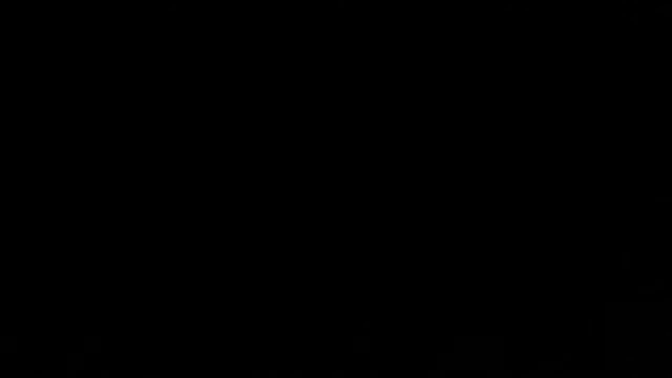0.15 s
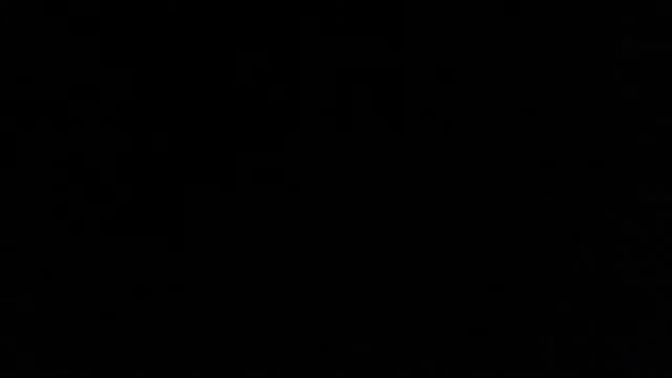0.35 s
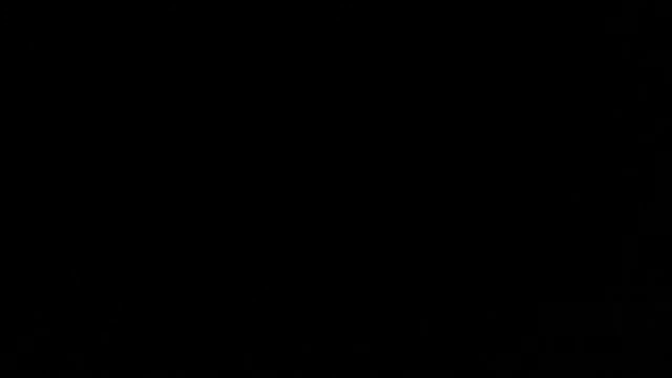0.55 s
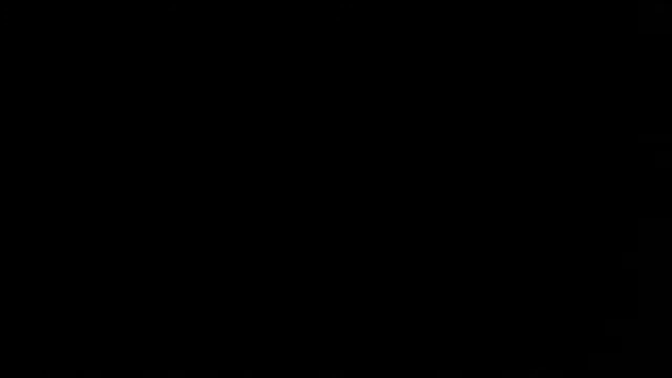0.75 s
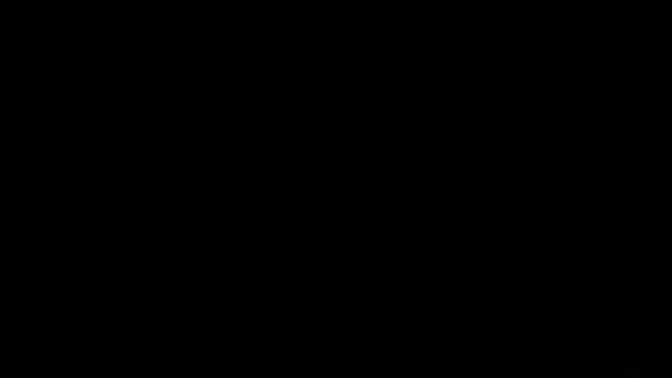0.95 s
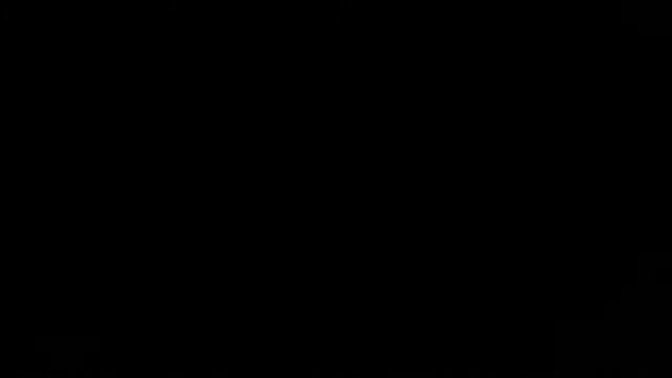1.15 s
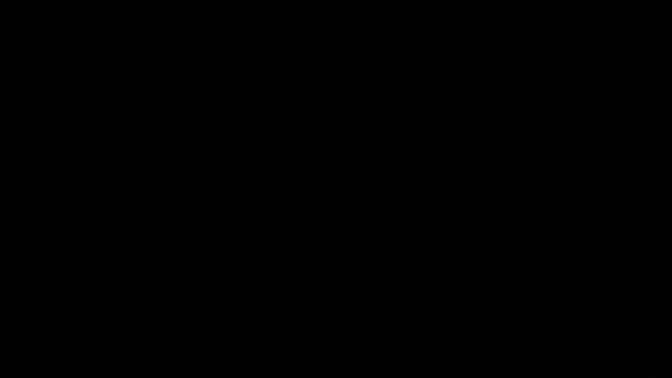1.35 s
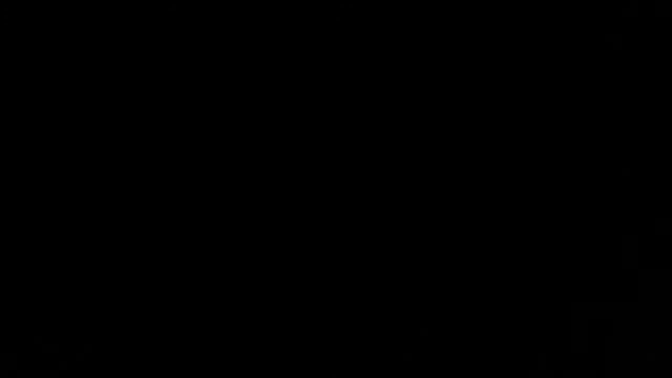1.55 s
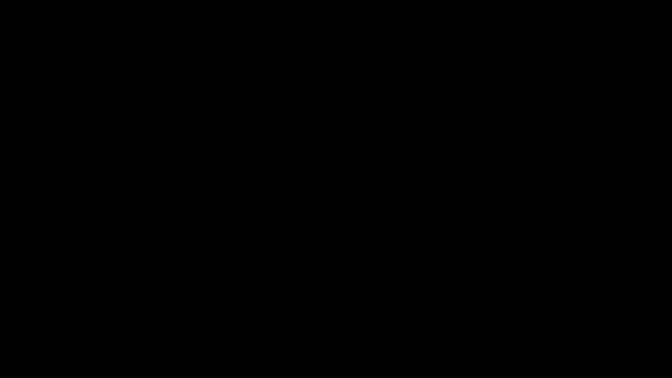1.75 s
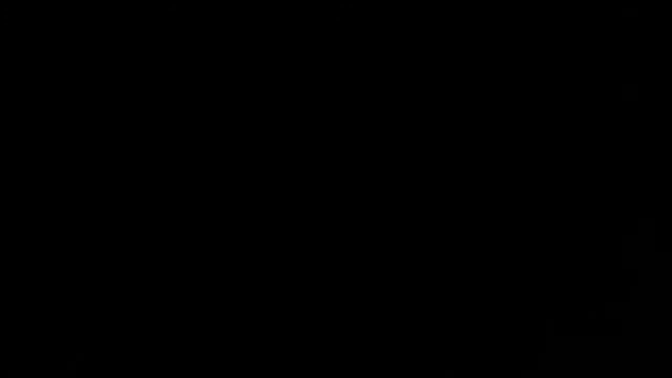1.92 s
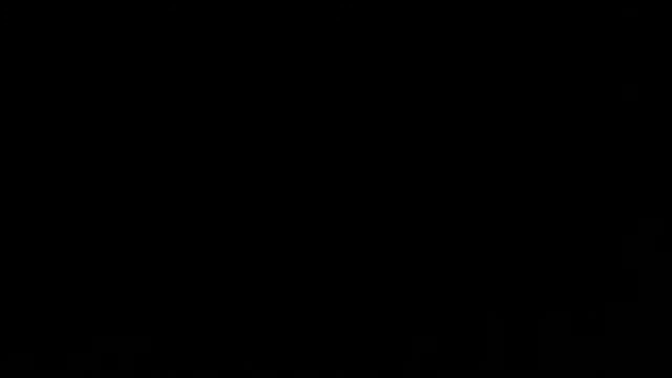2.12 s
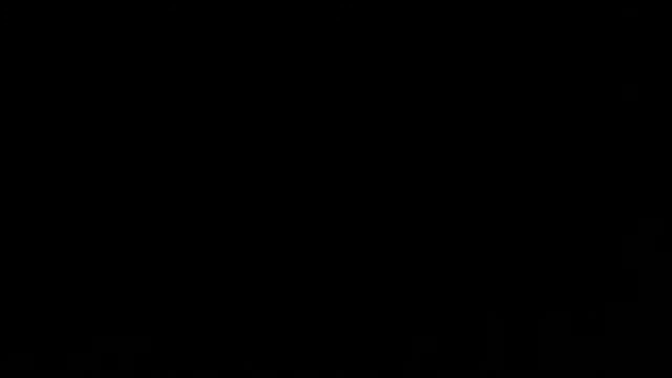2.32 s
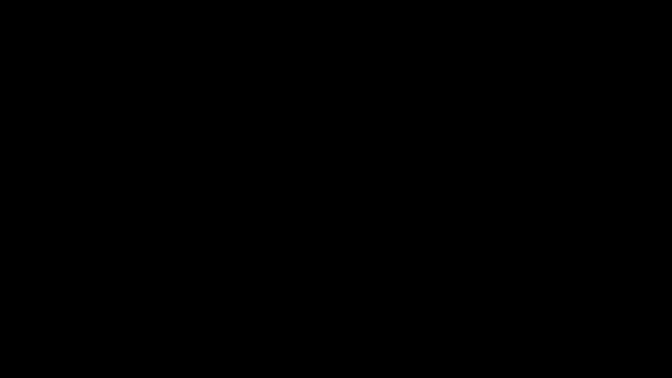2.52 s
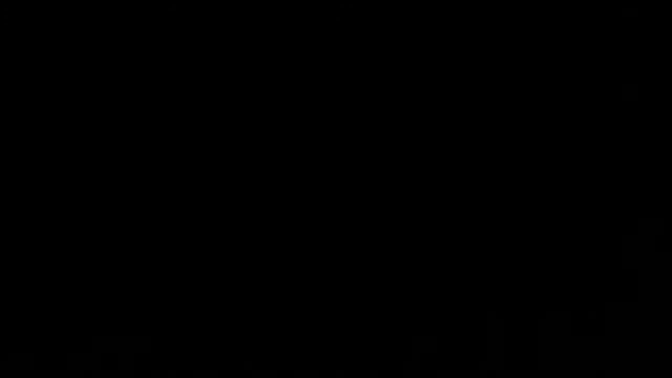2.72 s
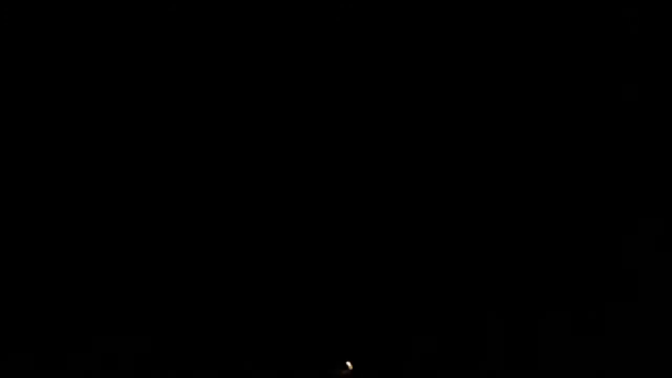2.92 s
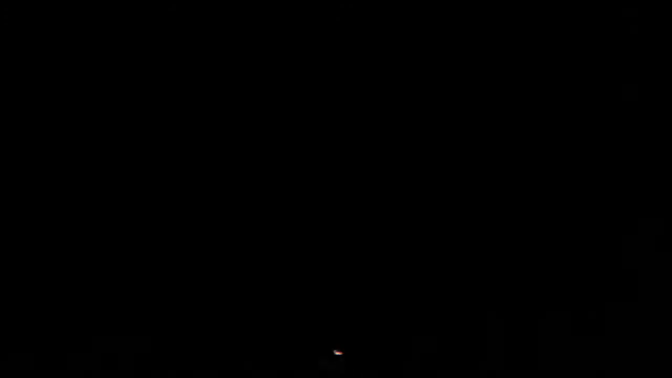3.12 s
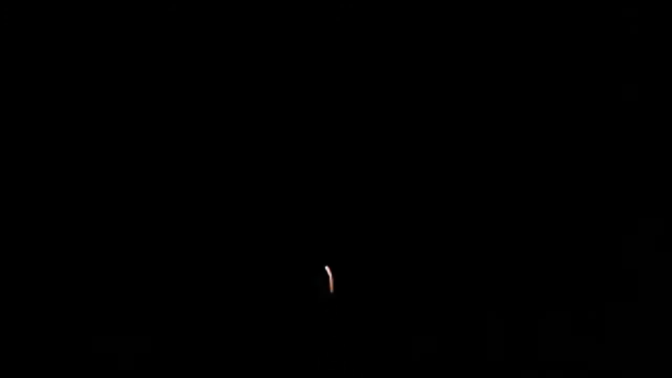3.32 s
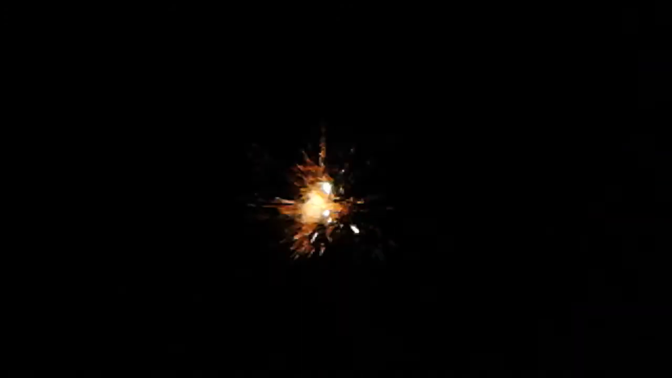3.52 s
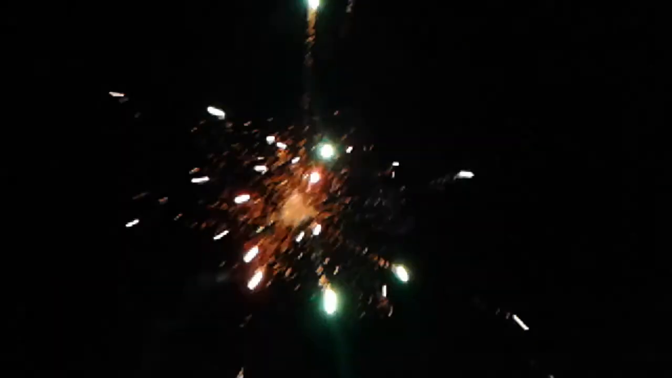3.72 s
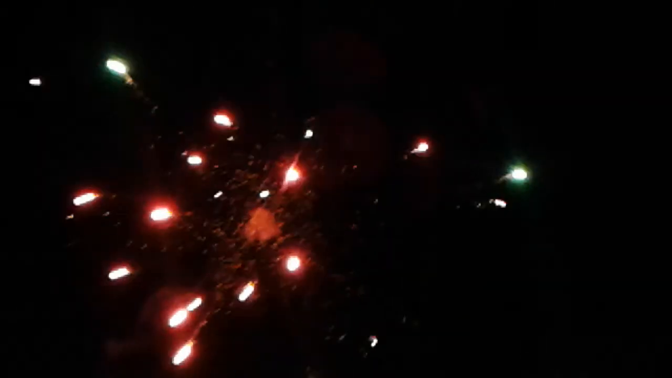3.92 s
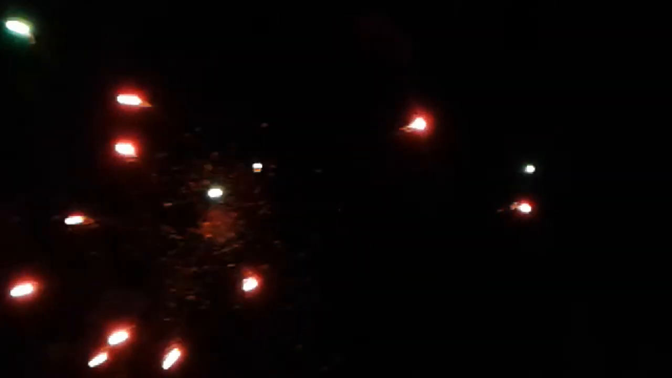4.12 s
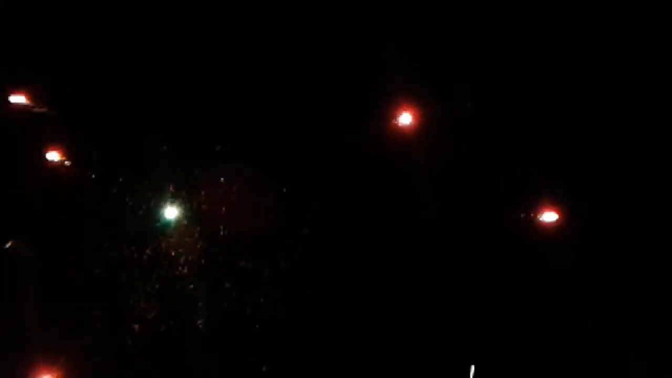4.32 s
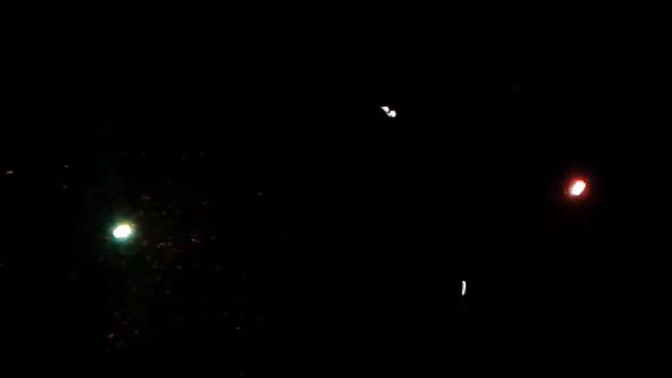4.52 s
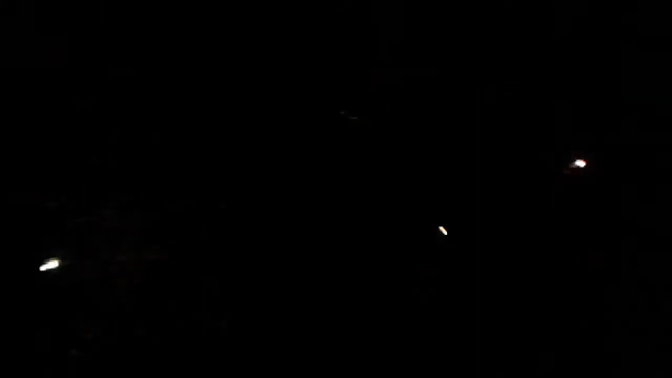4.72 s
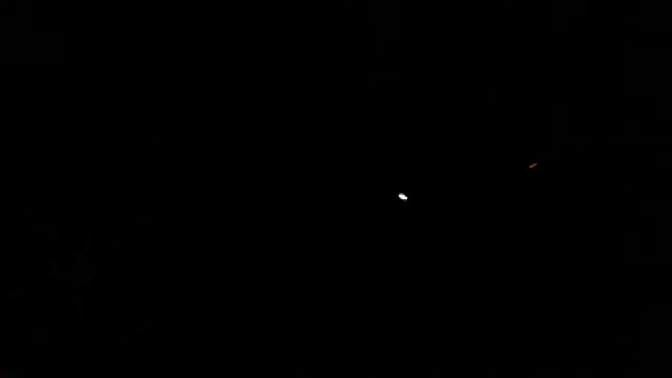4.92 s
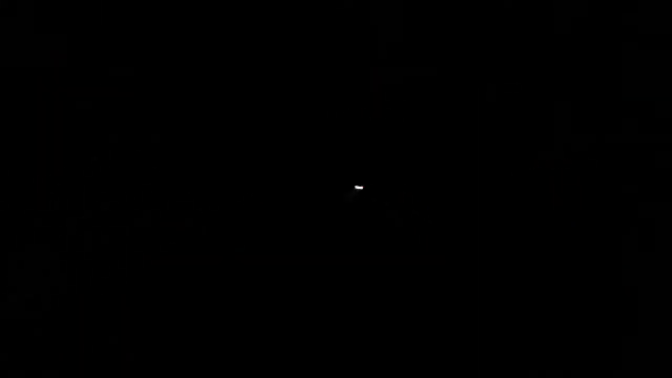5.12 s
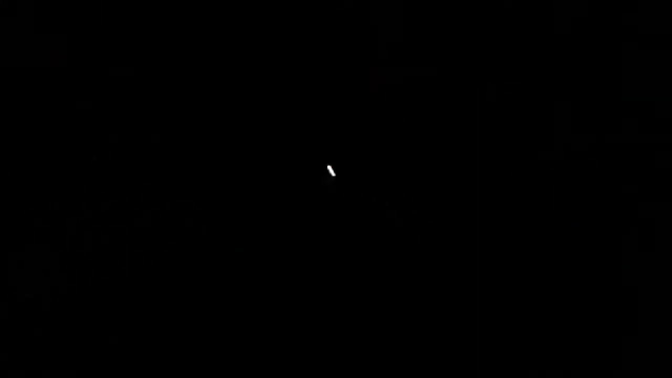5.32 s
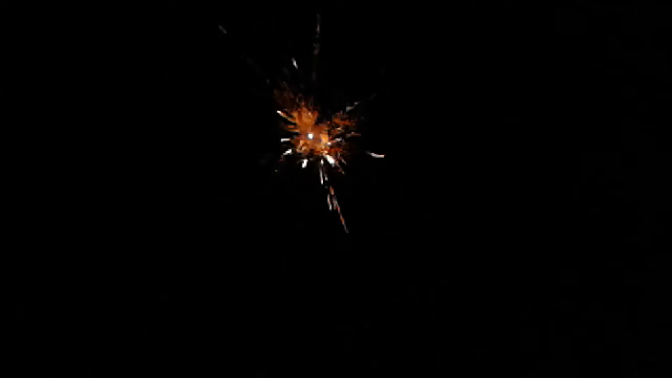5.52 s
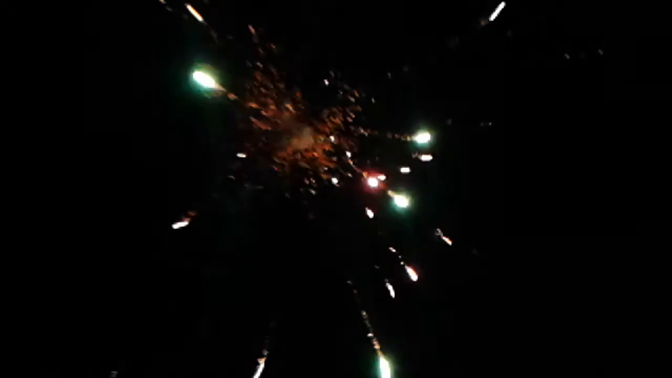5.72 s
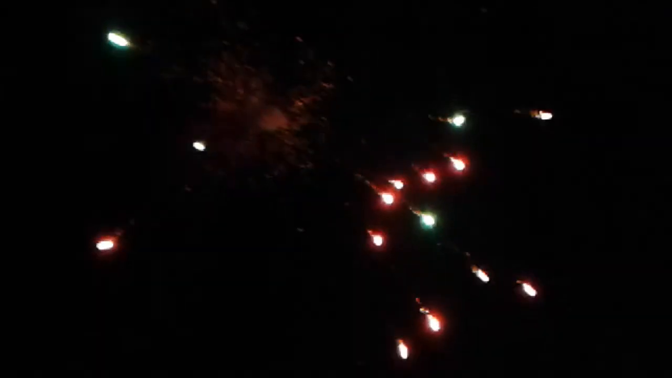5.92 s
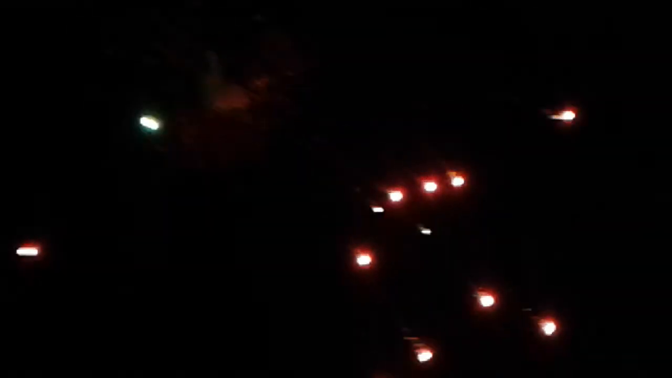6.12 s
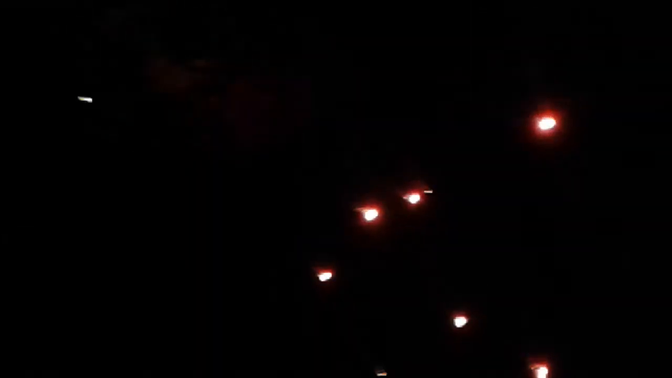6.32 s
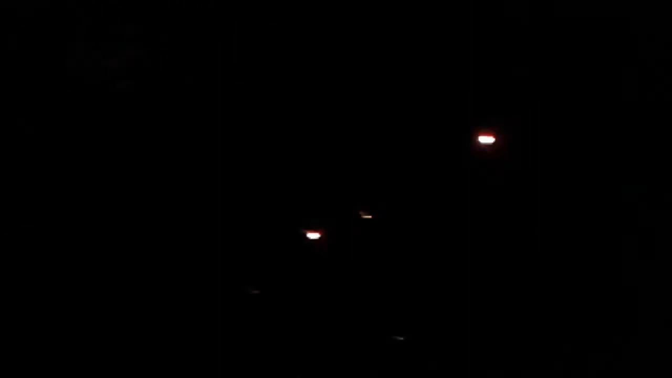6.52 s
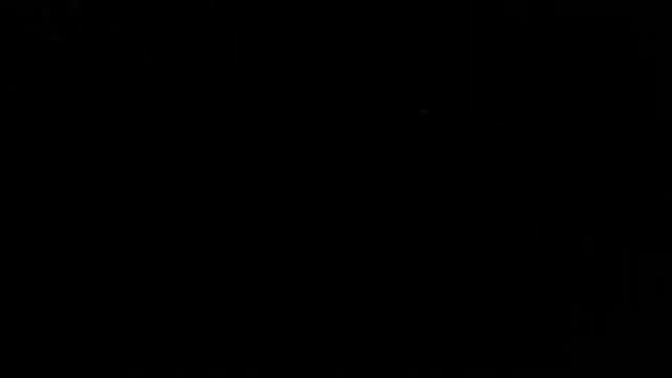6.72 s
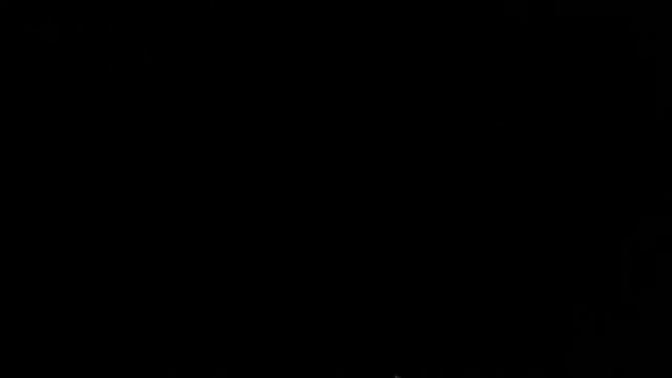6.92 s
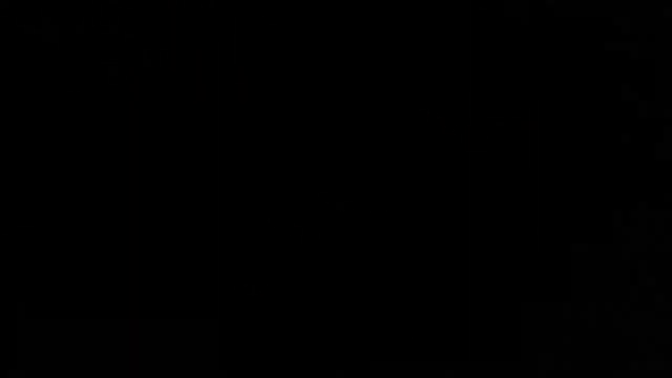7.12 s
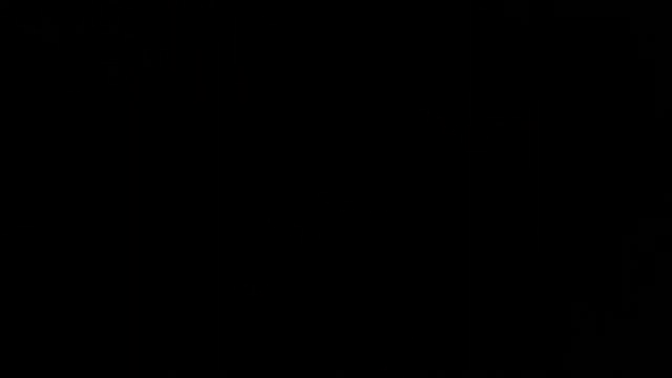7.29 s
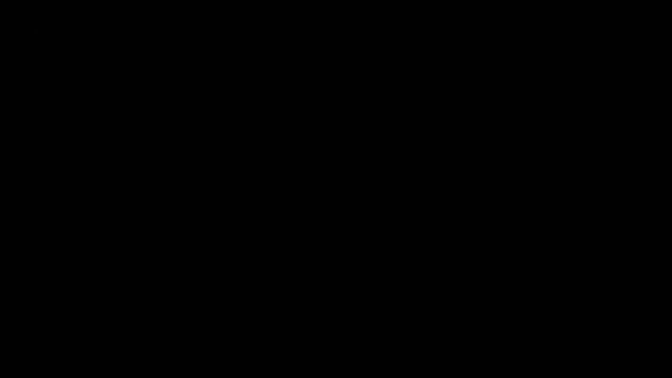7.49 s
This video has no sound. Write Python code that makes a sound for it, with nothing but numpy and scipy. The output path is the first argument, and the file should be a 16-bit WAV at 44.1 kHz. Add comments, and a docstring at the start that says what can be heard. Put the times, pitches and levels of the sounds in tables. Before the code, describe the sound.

On a street at night, a faint machine hum and a few dull thuds give way to a firework rocket thumping out of its tube. It shrieks with a wavering, raspy whistle that slowly falls in pitch. A second launches just as the first bursts, whistles downward too and ends in another bang. Both bangs overload the microphone, slap off the walls and roll away over a distant rumble.

```python
"""A street of houses at night, where two whistling rockets go up one after the other.
Each thumps out of its tube on a gust of gas, then shrieks as pulsing combustion drives its whistle;
the pitch sinks as the fuel burns away. Each ends in a bang that overloads the microphone, slaps back
off the walls and rolls away. Underneath sit a machine hum and night air, which dip after every blast,
a few dull thuds and faint ticks, and the far rumble of other fireworks."""
import sys
import numpy as np
from scipy import signal
from scipy.fft import rfft, irfft, next_fast_len
from scipy.io import wavfile
from scipy.ndimage import uniform_filter1d

SR = 44100
rng = np.random.default_rng(int(sys.argv[2]) if len(sys.argv) > 2 else 0)


def persist_wave(psi):
    """Save psi, clipped to +-1, as 16-bit WAV."""
    counts = np.round(np.clip(psi, -1, 1) * 32767).astype(np.int16)
    wavfile.write(sys.argv[1], SR, np.atleast_2d(counts).T)


N = 337409
TIME = np.arange(N) / SR
PAN = np.array([[.5], [-.5]])  # splits a left-right level difference between the channels

# Levels are in dB; the whistles, night bed and roll get an extra gain.
# stereo width of all noise (frequency [Hz], left-right correlation [-])
CORRELATION = [(30, 0), (200, 0.88), (500, 0.88), (1000, 0.22), (2000, 0), (4000, 0), (15000, 0.49)]
# tones of the machine hum (frequency [Hz], level [dB])
HUM_TONES = [(506, -64.5), (748, -69), (2024, -62)]
# fader ride of the far fireworks (time [s], level [dB])
RUMBLE_RIDE = [(0, -54), (3.5, -68), (4.2, -41), (7.54, -40.5), (7.64, -33.5)]
# EQ curves that colour each noise layer (frequency [Hz], spectral density [dB])
AIR_EQ = [(15, -37.5), (25, -9.5), (125, -4), (404, -16.5), (488, -3.5), (637, -18.5), (879, -13.5),
          (1120, -19), (1720, -14.5), (1860, -18), (2020, -13), (2930, -33.5), (6720, -31.5),
          (13800, -40.5), (15000, -45)]
RUMBLE_EQ = [(20, -31.5), (97, -7.5), (230, -3), (380, -2.5), (800, -12), (1800, -27), (8000, -67)]
THUD_EQ = [(15, -32), (30, -43.5), (60, 3.5), (110, 2), (220, -8.5), (400, -18), (1000, -42), (4000, -64)]
TICK_EQ = [(500, 11), (2800, 2.5), (5000, -3), (8000, 2.5), (14000, -35)]
GAS_EQ = [(15, -41.5), (35, -28), (70, 0.5), (130, 1.5), (350, -2.5), (600, -11), (1200, -7), (2200, -26.5),
          (6000, -15.5), (14000, -25)]
ROLL_EQ = [(20, -37), (90, -5), (170, -4), (300, 1), (480, 0), (800, -7), (1800, -14.5), (3000, -21.5),
           (7000, -18.5), (14000, -32)]
FUEL_HISS_EQ = [(100, -26.5), (300, -25), (1500, 2.5), (2700, 2), (4000, 9.5), (6000, 2), (8000, 11.5),
                (10000, -18), (14500, -19.5)]
BLAST_EQ = [(30, -46.5), (90, -7), (170, -0.5), (280, 5.5), (480, 6), (800, -3), (1800, -9.5), (3000, -25),
            (7000, -18), (14000, -41)]
# dull thuds (time [s], level [dB], decay [s], left over right [dB])
THUD_CUES = [(.762, -29, 0.041, 7), (.82, -34.5, 0.081, 7), (.881, -19, 0.0084, 17), (4.73, -31, 0.05, 6),
             (4.85, -29, 0.021, 4.5), (5.305, -28.5, 0.019, 14.5), (5.39, -33.5, 0.022, 2),
             (5.51, -26, 0.018, -3.5), (7.003, -23, 0.026, -6)]
# faint ticks (time [s], level [dB], decay [s])
TICK_CUES = [(1.033, -43.5, 0.034), (1.061, -53, 0.015), (1.243, -44, .008), (7.281, -39, 0.015),
             (7.402, -38.5, 0.015)]
# lifting charges (time [s], level [dB], knock trim [dB], factor on the gusts' cutoff [-])
LAUNCH_CUES = [(1.3313, -11, 3.5, 1), (3.433, -12.5, -4.5, 1)]
# stages of a launch: two gusts of gas, the fuel lighting, a far echo
# (delay [s], level [dB], rise [s], decay [s], cutoff [Hz])
LAUNCH_STAGES = [(.017, 1.5, .001, 0.036, 5800), (.028, -3, .0008, .008, 3000),
                 (.105, -11, .0014, .02, 2000), (.285, -13.5, .0044, 0.017, 1200)]
# reverb of the street (frequency [Hz], time to fall 60 dB [s])
STREET_DECAY = [(60, 2.4), (250, 2), (600, 2.4), (1500, 2.5), (3000, 1.3), (7000, 1.7), (14000, 0.18)]
# whistling rockets (tube catches [s], fuel spent [s], run-up [s], die-away [s], full pitch [Hz],
# pitch it sinks towards [Hz], fall time [s], wobble rate [Hz], wobble depth [share of pitch],
# first crest after [s], wobble lasts [s])
FLIGHTS = [(1.444, 3.61, .024, 0.091, 7473, 3960, .912, 6.8, .017, 0.071, 1.15),
           (3.572, 5.664, .047, 0.024, 7017, 3610, 1.448, 9.66, .03, .02, 0.156)]
# fader ride of each whistle; the second swells near the top (time [s], level [dB])
FIRST_RIDE = [(1.45, -21), (1.55, -19), (1.78, -13.5), (2.0, -17), (2.7, -17.5), (2.88, -20), (3.1, -18),
              (3.55, -21.5)]
SECOND_RIDE = [(3.58, -17.5), (3.75, -18.5), (3.95, -25.5), (4.45, -28), (4.7, -20), (4.88, -22.5),
               (4.97, -13.5), (5.09, -13.5), (5.19, -19), (5.64, -17.5)]
# grit of each burn (time [s], undertone gain [dB], overtone gain [dB], hiss gain [dB])
FIRST_GRIT = [(1.46, 10.5, -13, -17.5), (1.8, -6, -2.5, -29), (2.15, 6.5, 3.5, -21), (2.5, -1, 2, -28.5),
              (2.8, 5.5, 3.5, -23.5), (3.2, -12.5, -6, -26), (3.55, -3.5, -3, -19)]
SECOND_GRIT = [(3.58, 0.5, -11.5, -35), (3.898, -1, -5, -17), (4.3, 8, 6.5, -21), (4.8, 2.5, 4, -23.5),
               (5.05, -0.5, -3, -28.5), (5.35, 7.5, 2, -20.5), (5.65, 1, -11.5, -29.5)]
# the flame falters or flares (time [s], level change [dB], bend [share of pitch], half-length [s])
FLAME_FALTERS = [(1.684, 2.5, -.025, 0.017), (2.039, 0, -.025, 0.01), (2.102, 2.5, .02, 0.026),
                 (2.412, 2, .035, 0.012), (2.82, -3.5, -.01, .012), (2.926, -16, -.025, 0.014),
                 (3.052, -9.5, -.003, 0.011), (3.167, -19, -.003, .012), (3.407, -5.5, .003, 0.01),
                 (3.457, -21, -.01, 0.014), (3.532, 1.5, .04, 0.032), (4.557, 3.5, -.018, .025),
                 (4.626, -7.5, .015, 0.016), (5.012, -1, .018, 0.057)]
# partials of the tube (multiple of the main tone [-], level when shrill [dB], level when low [dB])
TUBE_PARTIALS = [(.25, -33, -55.5), (.5, -17, -24), (.75, -23, -39.5), (1, -0.5, 3), (1.25, -12, -54),
                 (1.5, -13.5, -16.5), (2, -25.5, -17.5), (2.5, -31.5, -27), (3, -32, -22.5)]
# the two microphone ports colour the whistle differently (frequency [Hz], left over right [dB])
WHISTLE_PAN = [(2000, 8.5), (3300, -1.5), (4500, 9), (5400, 9.5), (6500, 10), (7500, -9.5), (9000, -3.5),
               (11000, 4.5), (14700, 6.5)]
# walls around the launch place (delay [s], level [dB])
WALL_TAPS = [(.0047, -16), (.011, -15), (.019, -18), (.034, -22), (.258, -41)]
# bursting shells (time [s], level [dB], blast decay [s], shock length [s], boom [Hz], boom level [dB])
BURST_CUES = [(3.6313, 1.5, 0.015, 0.00084, 204.4, 5.5), (5.6695, -3.5, 0.025, 0.00058, 317, -18)]
# slapback of each burst off the walls (delay [s], level against the burst [dB], decay [s])
SLAPBACKS = [(0.0121, 8, 0.0012), (0.034, -11.5, 0.013), (.171, -13, .006), (0.254, -18.5, 0.015)]


def amp(db):
    """Decibels to linear gain."""
    return 10 ** (np.asarray(db) / 20)


def unit_rms(x):
    """Normalises to rms 1."""
    return x / np.sqrt(np.mean(x ** 2) + 1e-20)


def curve_at(points, hz):
    """Reads a curve on a log-frequency axis."""
    f, value = np.transpose(points)
    return np.interp(np.log(hz + 1), np.log(f + 1), value)


def wander(rate_hz):
    """Smooth random modulator of rms 1, moving at up to about the given rate."""
    size = next_fast_len(N, real=True)
    hz = np.fft.rfftfreq(size, 1 / SR)
    return unit_rms(irfft(rfft(rng.standard_normal(size)) / (1 + (hz / rate_hz) ** 2), size)[:N])


def noise(eq):
    """Coloured stereo noise of rms 1, narrow in the low mids and wide above."""
    size = next_fast_len(N)
    hz = np.fft.rfftfreq(size, 1 / SR)
    left, spread = rfft(rng.standard_normal((2, size)))
    alike = curve_at(CORRELATION, hz)
    right = alike * left + np.sqrt(1 - alike ** 2) * spread
    return unit_rms(irfft(np.array([left, right]) * amp(curve_at(eq, hz)), size)[:, :N])


def lowpass(x, hz):
    """Rolls off the top at 12 dB an octave."""
    return signal.sosfilt(signal.butter(2, min(hz, .45 * SR), fs=SR, output="sos"), x)


def hit(s, db, rise, decay):
    """Percussive envelope: quick attack, exponential decay."""
    age = np.maximum(TIME - s, 0)
    return amp(db) * (1 - np.exp(-age / rise)) * np.exp(-np.minimum(age / decay, 50))


def levelled(x, size=400):
    """Evens out a noise's short-time power, so the envelope alone shapes each hit."""
    return x / np.sqrt(uniform_filter1d((x ** 2).mean(0), size) + 1e-9)


def panned(x, pan_db, lag_s=0):
    """Sets a source to one side: the left channel is pan_db louder and trails by lag_s."""
    left = np.interp(TIME - lag_s, TIME, x[0], left=0)
    return np.array([left, x[1]]) * amp(pan_db * PAN)


def night_bed(gain_db=12, waver_hz=6, dip_s=.52, dip_db=22.5):
    """A wavering machine hum in night air; both dip after each blast, deeper for a louder one."""
    hum = sum(amp(db + 2 + 2 * wander(13)) * np.sin(2 * np.pi * np.cumsum(hz + waver_hz * wander(40)) / SR)
              for hz, db in HUM_TONES)
    air = amp(-57) * noise(AIR_EQ)
    dips = []
    for s, db, *_ in LAUNCH_CUES + BURST_CUES:
        age = np.maximum(TIME - s, 0) / dip_s  # deepest at 1
        dips.append((dip_db + .92 * db) * (age * np.exp(1 - age)) ** 2.2)
    return (hum + air) * amp(gain_db - np.max(dips, axis=0))


def far_rumble():
    """Other fireworks in the distance blur into a low wash that swells midway."""
    return noise(RUMBLE_EQ) * amp(np.interp(TIME, *np.transpose(RUMBLE_RIDE)) + .66 * wander(35))


def thuds():
    """Soft hits of bass noise dotted across the stereo field."""
    envelope = sum(hit(s, db, .0021, decay) * amp(pan_db * PAN) for s, db, decay, pan_db in THUD_CUES)
    return levelled(noise(THUD_EQ), size=800) * envelope


def ticks():
    """Tiny, sharp flecks of brighter noise."""
    return noise(TICK_EQ) * sum(hit(s, db, .00033, decay) for s, db, decay in TICK_CUES)


def launches(knock_db=-4, knock_s=.012, knock_hz=900):
    """The lifting charge knocks on the tube, then the gas bursts out."""
    gas = levelled(noise(GAS_EQ))
    knocks = sum(hit(s, db + trim_db + knock_db, .0004, knock_s) for s, db, trim_db, _ in LAUNCH_CUES)
    gusts = sum(lowpass(gas * hit(s + delay, db + stage_db, rise, decay), bright * hz)
                for s, db, _, bright in LAUNCH_CUES for delay, stage_db, rise, decay, hz in LAUNCH_STAGES)
    return lowpass(gas * knocks, knock_hz) + gusts


def street_reverb(x, decay_scale=1):
    """Scatter from houses and trees: a dense tail whose top dies first."""
    scatter = noise([(20, 0), (20000, 0)]) * amp(.8 * wander(15))
    hz, t, spectrum = signal.stft(scatter[:, :2 * SR], SR, nperseg=256)
    t60 = decay_scale * curve_at(STREET_DECAY, hz)[:, None]
    tail = signal.istft(spectrum * amp(-60 * t / t60), SR, nperseg=256)[1]
    tail *= 1 - np.exp(-np.arange(tail.shape[1]) / SR / .0079)  # soft onset
    return signal.fftconvolve(x, tail / np.linalg.norm(tail[0]), axes=1)[:, :N]


def roll(burst_db=12, launch_db=9):
    """Each blast gives the street one short push, which rolls away among the houses."""
    pushes = np.zeros(N)
    for cues, gain_db in ((BURST_CUES, burst_db), (LAUNCH_CUES, launch_db)):
        for s, db, *_ in cues:
            pushes[round(s * SR)] += amp(db + gain_db)
    spectrum = amp(curve_at(ROLL_EQ, np.fft.rfftfreq(2048, 1 / SR)))
    pulse = np.fft.fftshift(irfft(spectrum))
    return street_reverb(signal.oaconvolve(pushes, pulse / np.linalg.norm(pulse), "same")[None])


def flight(rocket, ride):
    """Pitch [Hz], level [dB] and falters [dB]: the empty part of the tube lengthens, so the pitch sinks."""
    caught, spent, run_up, die, full_hz, empty_hz, fall, wobble_hz, depth, crest, lasts = rocket
    age = np.maximum(TIME - caught, 0)
    glide_hz = empty_hz + (full_hz - empty_hz) * np.exp(-age / fall)
    cold = np.sqrt(np.clip((caught - TIME) / run_up, 0, 1))  # the tube starts flat and weak
    dying = np.clip(1 - (spent - TIME) / die, 0, 1)  # the last fuel sags and fades
    tumble = depth * np.cos(2 * np.pi * wobble_hz * (age - crest)) / (1 + (age / lasts) ** 8)
    overshoot = .035 * np.exp(-(age / .08) ** 2)
    bend = tumble + overshoot - .17 * cold - .05 * dying
    db = np.interp(TIME, *np.transpose(ride)) - 6 * cold - 11 * dying
    falter_db = 0
    for s, step_db, share, length in FLAME_FALTERS:
        if caught < s < spent:
            bump = np.exp(-np.minimum(((TIME - s) / length) ** 2, 50))
            bend += share * bump
            falter_db += step_db * bump
    return glide_hz * (1 + bend), db, falter_db


def whistle(rocket, ride, grit, gain_db, build_s, flutter_db, sputter_db, chug_hz=19, flare_db=2):
    """Pulsing combustion drives the tube over a hiss of fuel; the shriek steadies as it sinks."""
    caught, spent, run_up, *_ = rocket
    lit = caught - run_up
    hz, db, falter_db = flight(rocket, ride)
    grit_s, *columns = np.transpose(grit)
    under_db, over_db, hiss_db = (np.interp(TIME, grit_s, column) for column in columns)
    shrill = np.clip((hz - 4600) / 2200, 0, 1)
    screech = 1.2 * np.exp(-np.maximum(TIME - caught, 0) / .12)  # as the tube catches
    unrest = .55 + .6 * np.sqrt(shrill) + screech
    chug = .007 * np.sqrt(shrill) * np.sin(2 * np.pi * (chug_hz * TIME + .25 * wander(4.3)))
    shake = .009 * wander(30) + .0063 * wander(320) + .0048 * wander(1800)  # waver, jitter, rasp
    turns = np.cumsum(hz * (1 + chug + unrest * shake)) / SR
    lag = np.array([[0], [1]]) * (.24 + .09 * wander(23))  # turns by which the right channel trails
    fuzz = .055 * wander(300)  # each cycle's shape varies, roughening the overtones
    sputter = sputter_db * wander(18)  # uneven burning flares hiss and overtones together
    built = np.clip((TIME - lit - build_s) / .008, 0, 1)  # the other partials come in late
    under, over = built * amp(under_db), built * amp(over_db + sputter)
    tone = np.zeros((2, N))
    for k, shrill_db, low_db in TUBE_PARTIALS:
        gain = amp(low_db + shrill * (shrill_db - low_db))
        if k != 1:
            gain *= (under if k < 1 else over) * amp(flare_db * wander(4.6))
        audible = np.clip((17000 - k * hz) / 2000, 0, 1)
        pan = amp(curve_at(WHISTLE_PAN, k * hz) * PAN)
        pan /= np.sqrt((pan ** 2).mean(0))
        tone += gain * audible * pan * np.sin(2 * np.pi * (k * turns - lag + (k - 1) * fuzz))
    flutter = np.minimum([wander(80), wander(80)], .8)  # drops out further than it swells
    tone *= amp(flutter_db * unrest * flutter + falter_db)
    hiss = amp(hiss_db + .45 * sputter) * noise(FUEL_HISS_EQ)
    gate = np.clip((TIME - lit) / .0029, 0, 1) * np.clip((spent - TIME) / .006, 0, 1)
    return gate * amp(gain_db + db) * (tone + hiss)


def with_walls(x, drift_s=.0001):
    """Adds wall reflections, which beat against the gliding tone differently in each channel."""
    reflections = np.zeros((2, N))
    for delay, db in WALL_TAPS:
        for side in range(2):
            sent = TIME - delay - drift_s * wander(1.3)
            reflections[side] += amp(db) * np.interp(sent, TIME, x[side], left=0)
    return x + reflections


def bursts(shock_db=5, crack_db=5):
    """A shell bursts: shock front, crack, short boom and a blast of close reflections, then slapback."""
    blast = levelled(noise(BLAST_EQ))
    crack = noise([(500, 9.0), (2000, -2.5), (7500, -0.5), (14000, -29)])
    bangs = np.zeros((2, N))
    for s, db, decay, shock_s, boom_hz, boom_db in BURST_CUES:
        age = np.clip((TIME - s) / shock_s, 0, 50)
        bangs += amp(db + shock_db) * (age > 0) * (1 - age) * np.exp(-age)
        bangs += blast * hit(s, db, .000563, decay)
        bangs += crack * hit(s, db + crack_db, rise=.0001, decay=.0042)
        bangs += hit(s, boom_db, rise=.0037, decay=.011) * np.sin(2 * np.pi * boom_hz * (TIME - s))
    slaps = sum(hit(s + delay, db + slap_db, .0011, decay)
                for s, db, *_ in BURST_CUES for delay, slap_db, decay in SLAPBACKS)
    return bangs + (blast + amp(-19) * crack) * slaps


def scene():
    """The mix: whistles and blasts up front, the street's tail around them, the night behind."""
    first = whistle(FLIGHTS[0], FIRST_RIDE, FIRST_GRIT,
                    gain_db=4.5, build_s=.015, flutter_db=3.5, sputter_db=4)
    second = whistle(FLIGHTS[1], SECOND_RIDE, SECOND_GRIT,
                     gain_db=4, build_s=.04, flutter_db=2.5, sputter_db=3)
    shriek = with_walls(first + second)
    mix = shriek + street_reverb(amp(-28) * shriek, decay_scale=.5)
    mix += panned(launches(), pan_db=-2)
    mix += panned(bursts(), pan_db=-2, lag_s=.00014)
    mix += panned(roll(), pan_db=-2.5, lag_s=.00015)
    mix += thuds() + ticks()
    mix += panned(night_bed(), pan_db=-1.5, lag_s=-.00038)
    return mix + panned(far_rumble(), pan_db=-3.5, lag_s=.00016)


def record(dry, cutoff_hz=14800):
    """The microphone soft-clips the bangs at full scale; a steep low-pass trims the top."""
    clipped = dry / (1 + dry ** 8) ** (1 / 8)
    band_limit = signal.firwin(255, cutoff_hz, window=("kaiser", 8), fs=SR)
    return signal.oaconvolve(clipped, band_limit[None], "same")


dry = scene()
out = record(dry)
persist_wave(out)
```